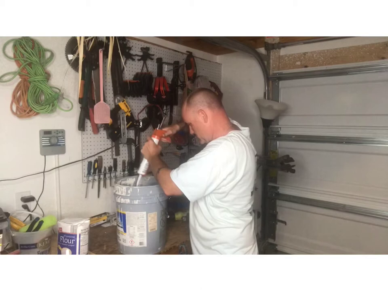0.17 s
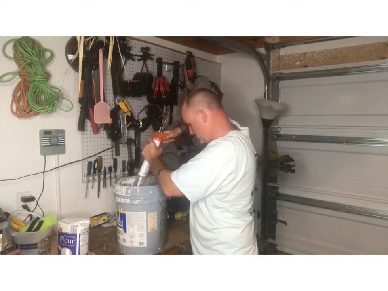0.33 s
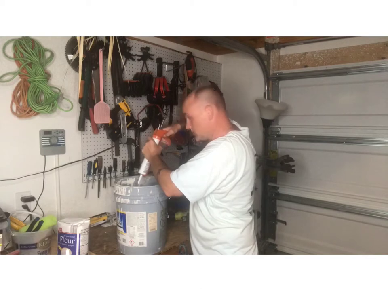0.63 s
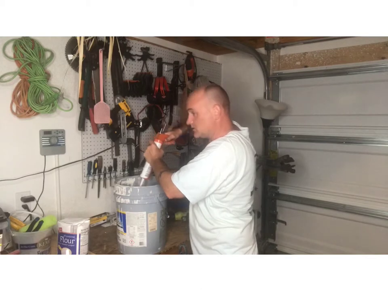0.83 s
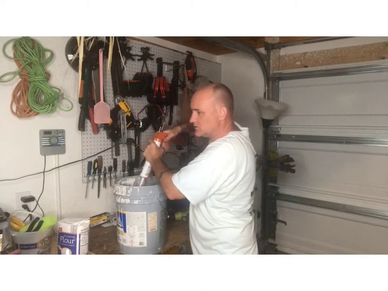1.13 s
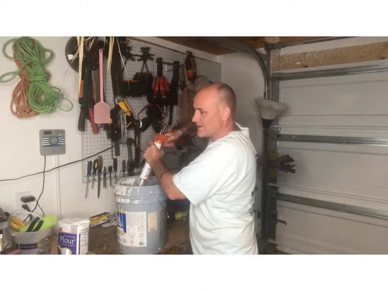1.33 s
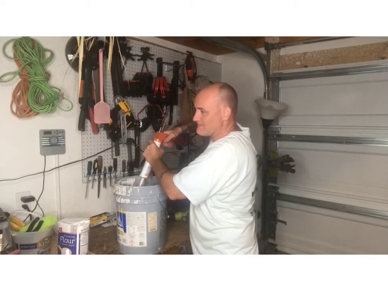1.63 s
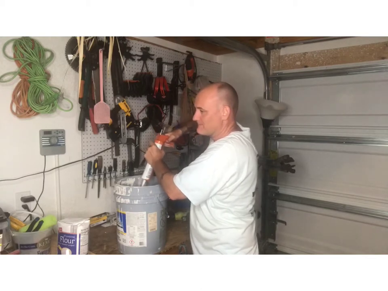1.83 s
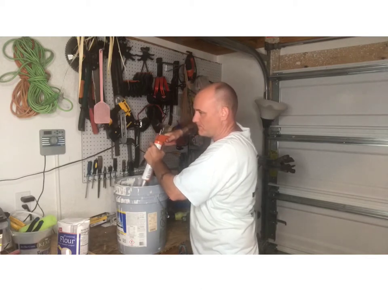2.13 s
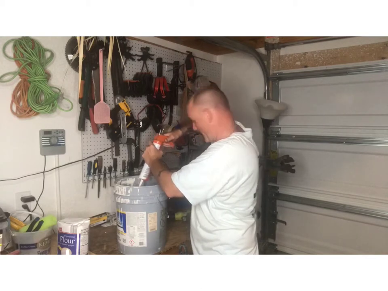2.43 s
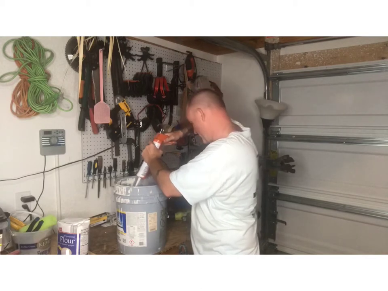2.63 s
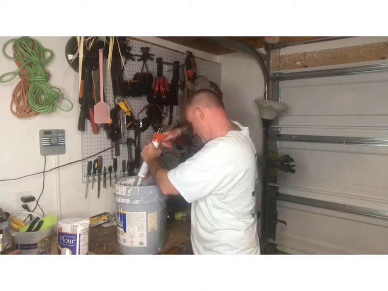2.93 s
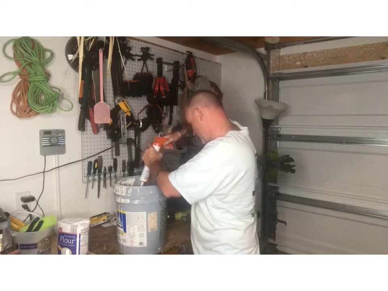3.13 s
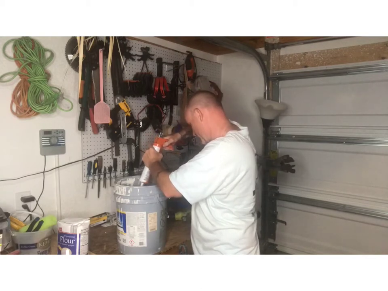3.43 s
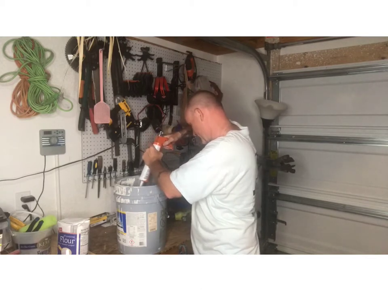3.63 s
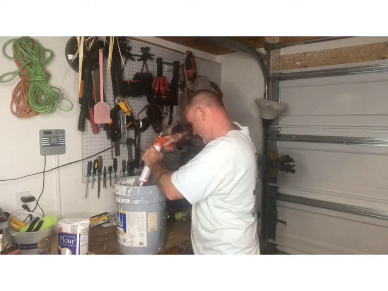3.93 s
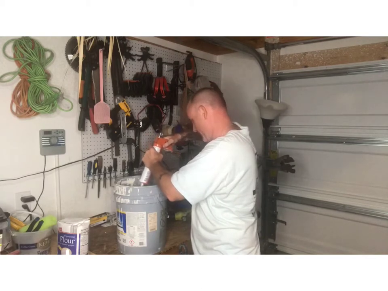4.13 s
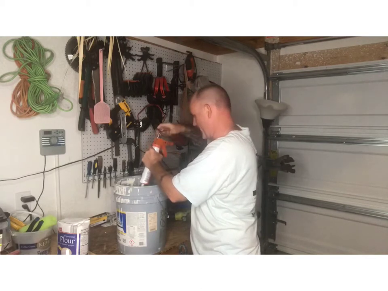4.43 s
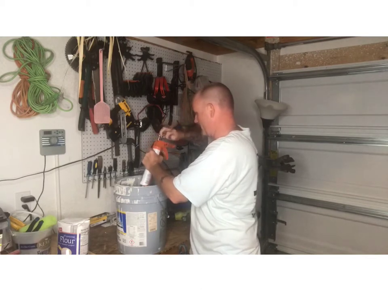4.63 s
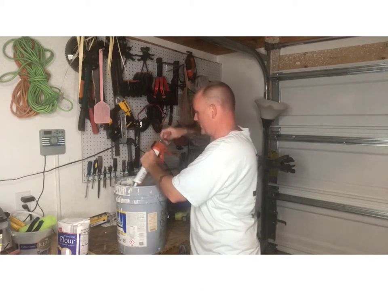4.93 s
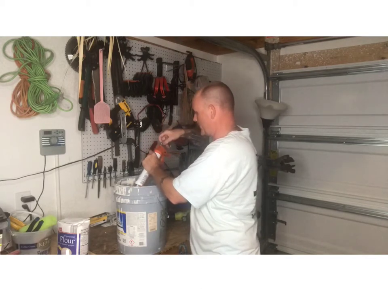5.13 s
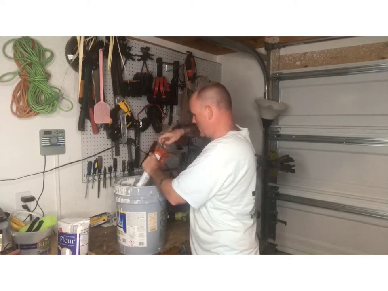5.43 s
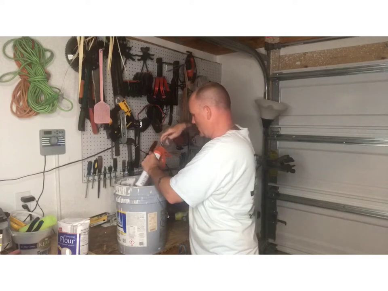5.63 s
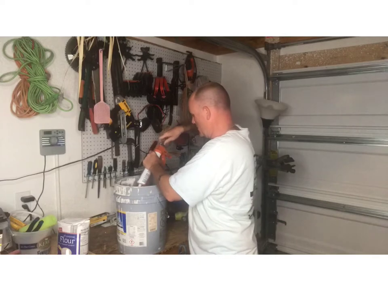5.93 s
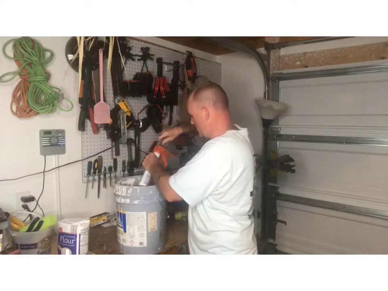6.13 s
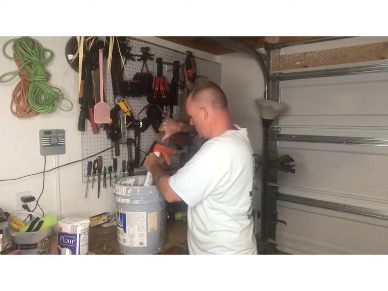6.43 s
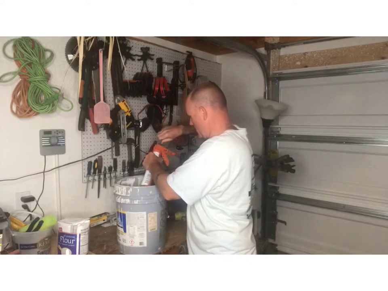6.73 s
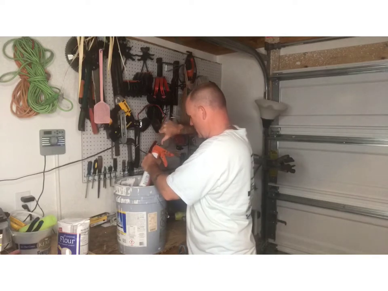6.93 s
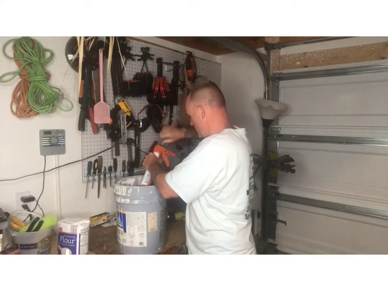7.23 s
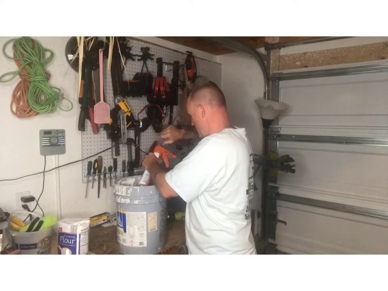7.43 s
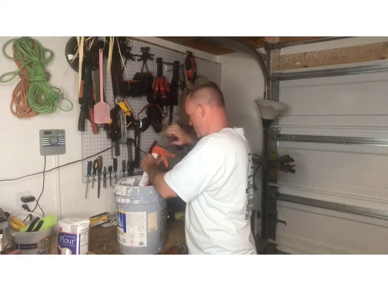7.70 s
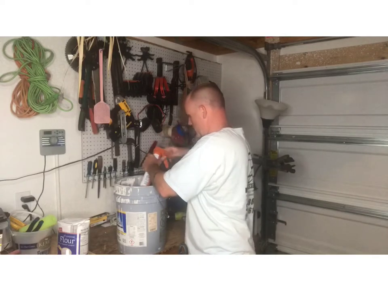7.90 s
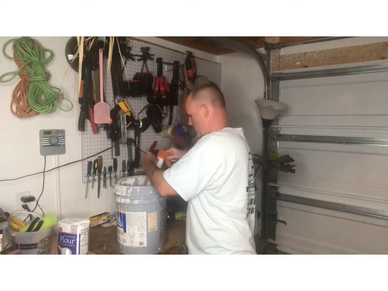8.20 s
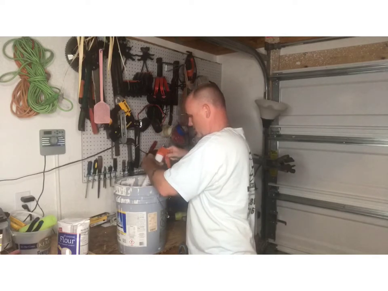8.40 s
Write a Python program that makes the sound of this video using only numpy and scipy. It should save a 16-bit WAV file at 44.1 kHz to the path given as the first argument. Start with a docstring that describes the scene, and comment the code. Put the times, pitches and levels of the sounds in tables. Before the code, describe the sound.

A caulking gun is pumped with rough squeals and sharp metal snaps, then its rod is dragged back in rattling jerks in a bare garage.

```python
"""Bare garage: a steel caulking gun is pumped six times into a plastic bucket; squeezes squeal, releases snap.
Then the catch is let go and the plunger rod is dragged back in jerks, rattling in the frame.
Squeal: stick-slip oscillator with overtones and hiss. Knocks: filtered noise bursts, on steel with ringing modes.
Drag: uneven noise ringing the rod. A phone a few metres away hears the hard room and a low mains hum.
"""
import sys
import numpy as np
from scipy import signal
from scipy.fft import rfft, irfft
from scipy.io import wavfile
from scipy.ndimage import uniform_filter1d

SR = 44100
rng = np.random.default_rng(int(sys.argv[2]) if len(sys.argv) > 2 else 0)


def persist_wave(psi):
    """Save psi, clipped to +-1, as 16-bit WAV."""
    counts = np.round(np.clip(psi, -1, 1) * 32767).astype(np.int16)
    wavfile.write(sys.argv[1], SR, np.atleast_2d(counts).T)


N = 377496
T = np.arange(N) / SR
RING = T[:SR]  # one-second time axis of a single event
# Event levels are relative: each function adds its own gain.


def undb(db):
    """Decibels to gain."""
    return 10 ** (np.asarray(db) / 20)


def unit(x):
    """Scale to rms 1."""
    return x / np.sqrt(np.mean(x ** 2))


def unit_energy(x):
    """Scale a response to unit energy: white noise passes at unchanged power."""
    return x / np.sqrt(np.sum(x ** 2))


def at_hz(points, hz):
    """Read (frequency [Hz], value) points on a log-frequency axis."""
    point_hz, value = np.transpose(points)
    return np.interp(np.log(np.maximum(hz, 1)), np.log(point_hz), value)


def through(x, response):
    """Pass a sound through an impulse response."""
    return signal.fftconvolve(x, response)[:len(x)]


def colour(x, points):
    """Causal minimum-phase filter with the (frequency [Hz], level [dB]) spectrum, made from its cepstrum."""
    size = 2048
    gain = undb(at_hz(points, np.linspace(0, SR / 2, size + 1)))
    cepstrum = irfft(np.log(gain))
    # fold onto positive time
    cepstrum[1:size] *= 2
    cepstrum[size + 1:] = 0
    response = irfft(np.exp(rfft(cepstrum)))[:size]
    return through(x, unit_energy(response))


def fade(t60_s):
    """Exponential decay, one second long."""
    return np.exp(-np.log(1000) * RING / max(t60_s, .002))


def walk(rate_hz):
    """Smooth random wander with spread 1."""
    hold = max(int(SR / rate_hz), 1)
    steps = np.repeat(rng.standard_normal(N // hold + 1), hold)
    return unit(uniform_filter1d(steps, hold)[:N])


def add(out, s, sound):
    """Mix a sound in at time s."""
    i = max(int(s * SR), 0)
    out[i:i + len(sound)] += sound[:N - i]


def ring(modes, scatter_db=6.0):
    """Damped modes; each contact point shares the blow out differently and detunes them a little."""
    detune = .007
    total = 0
    for (hz, db, t60_s), chance in zip(modes, rng.standard_normal((len(modes), 3))):
        level, phase, shift = chance
        wave = np.sin(2 * np.pi * (hz * (1 + detune * shift) * RING + phase))
        total = total + undb(db + scatter_db * level) * fade(t60_s) * wave
    return unit_energy(total)


def blow(s, db, treble_db, t60_s, ring_db):
    """One steel contact: time, strength, brightness, decay of its chatter and share of ring."""
    return s, db, treble_db, t60_s, ring_db


def blows(rows, spectrum, modes, attack_s, gain_db):
    """Steel on steel: a decaying noise chatter of tiny contacts plus the ringing modes."""
    out = np.zeros(N)
    rise = 1 - np.exp(-RING / max(attack_s, 1e-4))
    for s, db, treble_db, t60_s, ring_db in rows:
        tilt = [(hz, level + treble_db * np.clip(np.log2(hz / 2500) / 2, -.5, 1)) for hz, level in spectrum]
        chatter = rng.standard_normal(len(RING)) * fade(t60_s) * rise
        crack = colour(chatter, tilt)
        crack_size = np.sqrt(np.sum(crack ** 2))
        ringing = undb(ring_db) * crack_size * ring(modes)
        add(out, s, undb(db + gain_db) * (crack + ringing))
    return out


def taps(rows, spectrum, t60_s, gain_db):
    """Short, well damped contacts: decaying noise, its brightness set by a slope from 250 to 2000 Hz."""
    out = np.zeros(N)
    for s, db, slope_db in rows:
        tilt = [(hz, level + slope_db * np.log2(np.clip(hz, 250, 2000) / 1000)) for hz, level in spectrum]
        burst = rng.standard_normal(len(RING)) * fade(t60_s)
        add(out, s, undb(db + gain_db) * colour(burst, tilt))
    return out


# plate squeals during the squeezes:
# (time [s], length [s], fundamental [dB], overtones [dB], roughness [0-1])
SQUEALS = [(.202, 0.1, -41, -37, 0.41), (0.295, 0.088, -38, -35.5, 0.76), (.748, 0.1, -39.5, -40.5, .75),
           (0.841, .11, -38, -38, 0.47), (0.977, 0.033, -40.5, -46.5, .6),
           (1.292, 0.035, -43.5, -42.5, 0.84), (1.34, 0.033, -45, -38, 0.7),
           (1.382, 0.071, -30.5, -35.5, 0.2), (1.448, 0.096, -41, -36.5, 0.59),
           (1.877, 0.063, -41, -41, .6), (1.92, 0.12, -34, -35.5, 0.2), (2.032, 0.074, -34.5, -41.5, 0.15),
           (2.404, 0.15, -35, -38.5, .35), (2.515, .16, -30, -42, 0.37), (3.019, 0.089, -40, -53, 0.38)]
SQUEAL_ATTACK_S, SQUEAL_RELEASE_S = .012, .025


def squeezing():
    """Grip: gains of fundamental (arched) and overtones (quick attack), and the contact roughness."""
    tone, upper, rough = np.zeros(N), np.zeros(N), np.zeros(N)
    for s, length, tone_db, upper_db, roughness in SQUEALS:
        attack = np.clip((T - s) / SQUEAL_ATTACK_S, 0, 1)
        release = np.clip((s + length - T) / min(SQUEAL_RELEASE_S, length / 2), 0, 1)
        arch = np.sin(np.pi * np.clip((T - s) / length, 0, 1))
        tone += undb(tone_db) * np.sqrt(np.abs(arch))
        upper += undb(upper_db) * attack * release
        rough[T >= s] = roughness
    return tone, upper, rough


# stick-slip of drive plate on rod, one curve a squeeze: (time [s], mean slip rate [Hz])
SLIP_RATE = [
    [(0.21, 1059), (0.236, 827.4), (0.302, 906), (0.314, 1101), (0.34, 1128), (0.368, 863), (0.388, 1120),
     (0.41, 1155)],
    [(0.77, 946), (0.786, 885), (0.826, 1129), (0.87, 867), (0.92, 1315), (0.972, 1265), (0.98, 1130),
     (1.01, 1337)],
    [(1.3, 888), (1.35, 871), (1.368, 1076), (1.384, 1129), (1.458, 1132), (1.474, 992), (1.536, 1105),
     (1.56, 1082)],
    [(1.89, 884), (1.91, 1103), (1.932, 986), (1.986, 1085), (2.01, 1087), (2.018, 1017), (2.076, 1107),
     (2.11, 1098)],
    [(2.41, 943.5), (2.452, 900.5), (2.506, 1115), (2.528, 1062), (2.616, 1090), (2.648, 962),
     (2.674, 1080), (2.68, 1070)],
    [(3.02, 827), (3.034, 827), (3.046, 860), (3.068, 876), (3.078, 890), (3.088, 992), (3.108, 983),
     (3.11, 1003)],
]
# squeal spectrum: (frequency [Hz], level [dB])
SQUEAL_COLOUR = [(900, -21), (1450, -3.5), (1780, 5), (2150, -2.5), (2650, 4.5), (3050, -9), (3400, -3),
                 (4200, -0.5), (4900, -18), (5500, -12), (6700, -9.5), (8300, -20), (10400, -22.5),
                 (12000, -19), (15500, -22.5)]
# near this rate slips lock to the frame: fundamental swells, roughness drops by up to this share
LOCK_HZ, LOCK_WIDTH_HZ, LOCK_SMOOTHING = 1080, 110, 0.49


def squeal(tone_db, overtone_db, grit_db):
    """Plate sticks and slips on the rod about a thousand times a second; uneven slips smear the overtones."""
    slip_hz = np.interp(T, *np.concatenate(SLIP_RATE).T)
    tone_gain, upper_gain, roughness = squeezing()
    lock = 1 / np.hypot(1, 2 * (slip_hz - LOCK_HZ) / LOCK_WIDTH_HZ)
    rough = np.clip(roughness * (1 - LOCK_SMOOTHING * lock), .15, .85)
    unevenness = .06 * walk(700) + .06 * walk(190) + .05 * walk(2000)
    phase = 2 * np.pi * np.cumsum(slip_hz * (1 + rough * unevenness)) / SR
    # each overtone comes and goes as the contact shifts
    overtones = 0
    for k in range(2, 14):
        level_db = at_hz(SQUEAL_COLOUR, k * slip_hz) - .6 * k + 6 * np.tanh(walk(130))
        overtones = overtones + undb(level_db) * np.sin(k * phase)
    # every slip sheds a little hiss, in stuttering bursts
    stutter = undb(4 * np.tanh(walk(320)))
    slip_bursts = (1 + np.cos(phase)) ** 2
    grit = colour(rng.standard_normal(N) * slip_bursts * stutter, SQUEAL_COLOUR)
    upper = undb(overtone_db) * np.sqrt(1 - rough) * unit(overtones)
    upper = upper + undb(grit_db) * np.sqrt(rough) * unit(grit)
    tone = np.sqrt(2) * np.sin(phase) * undb(5 * rough * np.tanh(walk(190)))
    # rougher contact breaks the squeal into grains
    grains = undb(7.5 * rough * np.tanh(walk(110)))
    return grains * (undb(tone_db) * tone_gain * lock * tone + upper_gain * upper)


# trigger let go, plate slides home and snaps, trigger hits its stop: (snap time [s], slide length [s],
# slide level [dB], snap level [dB], stop delay [s], stop level [dB], thrum level [dB])
RELEASES = [(0.0337, 0.043, -40.5, -20, 0.009, -22, -54), (.598, 0.037, -45.5, -18, 0.0097, -25, -51.5),
            (1.159, 0.046, -42, -17.5, 0.0018, -21, -55.5), (1.714, 0.043, -39, -21, .0071, -20.5, -46),
            (2.2631, .05, -47, -27.5, .006, -24.5, -53), (2.8655, 0.054, -48.5, -20, 0.0095, -15, -40.5)]
# lighter knocks of the trigger in the frame: (time [s], level [dB])
KNOCKS = [(0.6279, -25.5), (2.2417, -31.5), (2.3444, -39.5), (2.8474, -31)]
# snap spectrum: (frequency [Hz], level [dB])
SNAP_COLOUR = [(120, -54.5), (300, -11.5), (530, -22.5), (850, -16.5), (1300, -6.5), (1750, 1.5),
               (2250, -2.5), (2650, -7), (3650, -3), (4800, -12), (6800, -9), (10200, -23.5), (13900, -24),
               (15500, -33.5)]
# modes of the frame under load: (frequency [Hz], level [dB], t60 [s])
FRAME_MODES = [(1598, -3.5, .1), (1710, 2, .1), (1795, -2, .12), (2146, -5, .12), (2550, -1.5, .08),
               (2695, -4, .06), (3120, -2, .08), (3155, -3, .08), (3498, -5, .08), (4270, -4.5, .063)]


def trigger_snaps():
    """Release: bright, dry snap of the plate, then a duller blow on the stop that rings the frame."""
    rows = [blow(s, db, treble_db=-5.0, t60_s=.065, ring_db=-1.5) for s, db in KNOCKS]
    for s, _, _, snap_db, delay, stop_db, _ in RELEASES:
        rows.append(blow(s, snap_db, treble_db=7.5, t60_s=0.053, ring_db=-11))
        rows.append(blow(s + delay, stop_db, treble_db=6.0, t60_s=0.067, ring_db=-1.5))
    return blows(rows, SNAP_COLOUR, FRAME_MODES, attack_s=.0005, gain_db=-7)


# rod spectrum: (frequency [Hz], level [dB])
ROD_COLOUR = [(120, -40.5), (320, -10.5), (470, -25), (720, -14), (980, -6), (1280, -14), (1650, -3.5),
              (2250, 0), (2900, -5.5), (3800, -5), (5000, -11.5), (7000, -13.5), (10200, -25), (12700, -23),
              (15500, -32.5)]


def trigger_return(overlap_s=.004, whistle_s=.026, whistle_hz=3580, whistle_db=-10, gain_db=-1):
    """Unloaded plate slides back along the rod into each snap: a brief whistle and a growing rasp."""
    out = np.zeros(N)
    arch = np.sin(np.pi * np.minimum(RING / whistle_s, 1))
    for s, length, slide_db, *_ in RELEASES:
        slide_s = length + overlap_s
        swell = RING / slide_s * (RING < slide_s)
        rasp = colour(rng.standard_normal(len(RING)) * swell, ROD_COLOUR)
        pitch_hz = whistle_hz * (1 + .015 * walk(600)[:len(RING)])
        whistle = np.sqrt(2) * arch * np.sin(2 * np.pi * np.cumsum(pitch_hz) / SR)
        add(out, s - length, undb(slide_db) * (rasp + undb(whistle_db) * whistle))
    return undb(gain_db) * out


# rod dragged back in jerks, each ending in a jolt to the cartridge:
# (time [s], swell [s], hold [s], level [dB], thrum level [dB])
PULLS = [(4.341, 0.058, 0.0016, -44.5, -49.5), (4.595, 0.066, 0.061, -57, -67),
         (5.361, 0.056, 0.016, -51.5, -54.5), (5.511, 0.12, .01, -32.5, -59.5),
         (6.174, 0.11, 0.019, -31.5, -36), (6.309, 0.092, 0.038, -32.5, -36.5),
         (6.801, 0.052, 0.1, -37.5, -55), (7.258, 0.019, 0.0022, -48, -64),
         (7.394, 0.025, 0.04, -43.5, -66), (7.992, 0.033, 0.0037, -46, -52.5),
         (8.056, 0.1, .04, -54.5, -64), (8.491, 0.037, .03, -59, -56)]
PULL_RANGE_DB, PULL_RELEASE_S = 27, 0.043


def pulling():
    """Strength of the drag: each jerk swells, holds and dies away."""
    gain = 0
    for s, swell, hold, db, _ in PULLS:
        corners = s + np.cumsum([0, swell, hold, PULL_RELEASE_S])
        drop_db = np.interp(T, corners, [PULL_RANGE_DB, 0, 0, PULL_RANGE_DB], left=np.inf, right=np.inf)
        gain = gain + undb(db - drop_db)
    return gain


# modes of the free rod and frame: (frequency [Hz], level [dB], t60 [s])
ROD_MODES = [(937.7, -11, 0.48), (1002, -12, 0.051), (1586, -6.5, 0.075), (1657, 8.5, 0.053),
             (1760, -5.5, 0.23), (1974, 0, 0.1), (2089, 0, 0.32), (2247, 6.5, 0.16), (2450, -10, 0.12),
             (2695, -2.5, 0.22), (2660, -4, 0.057), (3050, -22, 0.079), (3620, 1, 0.06), (4300, -10, 0.11)]


def rod_drag(ring_db=-4, gain_db=-5.0, guides=2):
    """Rod scrapes through its holes: fine uneven catches at both guides ring the steel."""
    out = 0
    for _ in range(guides):
        grain = undb(9 * np.tanh(walk(1300)) + 5.5 * np.tanh(walk(220)))
        catches = unit(rng.standard_normal(N) * grain) * pulling()
        ringing = through(catches, ring(ROD_MODES, scatter_db=3.0))
        out = out + colour(catches, ROD_COLOUR) + undb(ring_db) * ringing
    return undb(gain_db) * out / np.sqrt(guides)


# loose rod knocks in its guides: (time [s], level [dB], treble [dB], ring [dB])
CLANKS = [(4.381, -25, 6, -11), (4.4102, -10, 7.5, -16), (4.6059, -37, -3, -13), (4.6839, -34, 8.5, 1),
          (4.7337, -42.5, -8, 6.5), (4.7628, -36.5, -4, -20), (5.001, -46, -7, -4), (5.338, -52, -0.5, 3.5),
          (5.4128, -32.5, -6.5, -5.5), (5.548, -34.5, 0, -21), (5.61, -21.5, 9.5, -31),
          (5.6441, -16, 6.5, -34), (5.8283, -39.5, 7, 5.5), (5.8619, -32, -8.5, -10),
          (6.188, -36.5, -20.5, -9.5), (6.2293, -25, -3.5, -1), (6.2634, -20.5, 5.5, 1),
          (6.433, -23, 15, 8), (6.4524, -19.5, 1, -9), (6.47, -19, 0.5, -3), (6.632, -38.5, 7, -20),
          (6.794, -29, 0.5, -11), (6.8873, -21, 5, -8), (6.9285, -24, 5, -0.5), (7.2808, -36.5, -12, -1),
          (7.3318, -51, 6, 6.5), (7.4015, -28, -1.5, -1), (7.4892, -22.5, -4.5, -13),
          (7.664, -38, -2.5, -10), (8.0281, -27.5, -0.5, -14.5), (8.379, -34.5, 5, -19),
          (8.391, -35.5, 3, -5)]
# chatter decay by strength, longest for the faintest: (level [dB], t60 [s])
CHATTER = [(-45.5, 0.12), (-32, 0.074), (-10, 0.078)]
# faint random rattle; level before the gain common to all clanks
RATTLE_FROM_S, RATTLE_TO_S, RATTLE_DB = 4.6, 7.3, -54


def rod_clanks(scatter_db=3, count=10):
    """Loose rod hits its guides and rattles faintly at random among the knocks."""
    rows = []
    for s, db, treble_db, ring_db in CLANKS:
        t60_s = np.interp(db, *np.transpose(CHATTER))
        rows.append(blow(s, db, treble_db, t60_s, ring_db))
    for k, (when, size) in enumerate(rng.random((count, 2))):
        s = RATTLE_FROM_S + (RATTLE_TO_S - RATTLE_FROM_S) * (k + when) / count
        db = RATTLE_DB + scatter_db * (2 * size - 1)
        rows.append(blow(s, db, treble_db=-5.5, t60_s=0.069, ring_db=5.5))
    return blows(rows, ROD_COLOUR, ROD_MODES, attack_s=0.0017, gain_db=-12.5)


# tick spectrum: (frequency [Hz], level [dB])
TICK_COLOUR = [(2200, -14), (3500, -1.5), (4400, -4.5), (5000, -11), (6000, 2), (7700, -4), (8500, -7.5),
               (11800, -4), (13000, -11), (15500, -19.5)]
# modes of the spring's coils: (frequency [Hz], level [dB], t60 [s])
SPRING_MODES = [(3030, -8, .07), (4290, -1, .07), (5740, 0, 0.045), (7700, -2, 0.066)]
TICK_FROM_S, TICK_EVERY_S, TICK_DB = 3.78, .1037, -54


def spring_ticks(ring_db=-7, count=5):
    """Relaxing spring: a short, even run of bright ticks that ring the coils."""
    rows = [(TICK_FROM_S + k * TICK_EVERY_S, TICK_DB, 0) for k in range(count)]
    ticks = taps(rows, TICK_COLOUR, t60_s=0.051, gain_db=0)
    return ticks + undb(ring_db) * through(ticks, ring(SPRING_MODES, scatter_db=5.5))


# freed spring sings once: (time [s], pitch [Hz], peak [dB], t60 [s])
SPRING = [(4.41, 926, -52, .9)]


def spring_ping():
    """One thin ring, a decaying sine, as the catch lets go."""
    out = np.zeros(N)
    for s, hz, db, t60_s in SPRING:
        add(out, s, undb(db) * fade(t60_s) * np.sin(2 * np.pi * hz * RING))
    return out


# cartridge bumps the bucket: (time [s], level [dB], slope [dB/octave], thrum level [dB])
BUMPS = [(.112, -38, 8, -49), (0.486, -37.5, 0.5, -62), (1.219, -36.5, 2, -44.5), (2.258, -28.5, 7, -48.5),
         (2.343, -39, -1, -53.5), (2.476, -29.5, 4, -69), (2.555, -29.5, 3.5, -75), (2.866, -43, -0.5, -73),
         (4.387, -40, -2.5, -48), (7.089, -45.5, 1.5, -55), (7.406, -44, 5, -70), (7.493, -32.5, 7, -55),
         (8.087, -42, 1.5, -60), (8.17, -34, -2.5, -46), (8.195, -40, 1, -51), (8.287, -47, 4, -52),
         (8.384, -34, 0, -44.5)]
# bucket spectrum: (frequency [Hz], level [dB])
BUCKET_COLOUR = [(90, -14.5), (160, 0), (230, -4), (340, -2.5), (450, -10), (560, -0.5), (750, -6.5),
                 (1020, 3), (1300, -8.5), (1700, -7.5), (4000, -11), (12000, -29)]


def bucket_bumps(after_s=.014, after_db=-3):
    """Dull knocks on the plastic bucket; the cartridge bounces once."""
    first = [(s, db, slope) for s, db, slope, _ in BUMPS]
    second = [(s + after_s, db + after_db, slope) for s, db, slope in first]
    knocks = taps(first, BUCKET_COLOUR, t60_s=.08, gain_db=-11)
    bounces = taps(second, BUCKET_COLOUR, t60_s=.07, gain_db=-13)
    return knocks + bounces


# note of the cartridge, sinking unevenly as it empties: (time [s], pitch [Hz])
CARTRIDGE_NOTE = [(.1, 413), (.62, 370), (1.22, 405), (1.72, 343), (2.3, 320), (8.4, 317)]
THRUM_T60_S, THRUM_ATTACK_S = .29, .006


def thrums(gain_db=-1, pair_ratio=1.045, pair_db=-7, flutter_db=1.0):
    """Releases, bumps and pulls jolt the cartridge into its low note: two close modes beat and flutter."""
    jolts = [(s, db) for s, *_, db in RELEASES + BUMPS]
    jolts += [(s + swell + hold, db) for s, swell, hold, _, db in PULLS]
    out = np.zeros(N)
    shape = fade(THRUM_T60_S) * (1 - np.exp(-RING / THRUM_ATTACK_S))
    for (s, db), turn in zip(jolts, rng.random(len(jolts))):
        hz = np.interp(s, *np.transpose(CARTRIDGE_NOTE))
        low = np.sin(2 * np.pi * hz * RING)
        high = np.sin(2 * np.pi * (hz * pair_ratio * RING + turn))
        add(out, s, undb(db + gain_db) * shape * (low + undb(pair_db) * high))
    return out * undb(flutter_db * np.tanh(walk(60)))


# tiny pips close to the microphone: (time [s], level [dB])
PIPS = [(3.4106, -60), (3.7481, -53.5), (6.0796, -61.5), (6.7476, -59.5), (7.7474, -58.5)]


def pips(hz=1200, length_s=0.0088, gain_db=1):
    """A few cycles of a soft, dry tone."""
    out = np.zeros(N)
    bell = np.sin(np.pi * np.minimum(RING / length_s, 1)) ** 2
    pip = np.sin(2 * np.pi * hz * RING) * bell
    for s, db in PIPS:
        add(out, s, undb(db + gain_db) * pip)
    return out


# decay of the room: (frequency [Hz], t60 [s])
GARAGE = [(125, 0.8), (500, 0.59), (1100, 0.4), (2000, 0.5), (4000, 0.33), (8000, 0.35), (15000, 0.25)]


def garage(build_s=0.00067):
    """Dense echoes of bare walls: noise split into bands, the top dying well before the bass."""
    noise = rfft(rng.standard_normal(len(RING)))
    freqs = np.linspace(0, SR / 2, len(noise))
    tail = 0
    for hz, t60_s in GARAGE:
        share = at_hz([(f, float(f == hz)) for f, _ in GARAGE], freqs)
        tail = tail + irfft(noise * share, len(RING)) * fade(t60_s)
    return unit_energy(tail * (1 - np.exp(-RING / build_s)))


# still-air spectrum: (frequency [Hz], level [dB])
AIR_COLOUR = [(15, -27.5), (25, -10.5), (69, -1), (156, -9.5), (340, -12), (469, -14.5), (895, -18),
              (1170, -17), (2120, -28), (4150, -26), (4870, -31), (6210, -27.5), (10400, -38),
              (13900, -32.5), (15500, -44)]
MAINS_HZ = 59


def background(air_db=-70.5, hum_db=-71, waver_db=1.5, octave_db=-10):
    """Still air as filtered noise, and the wavering hum of a motor on the mains with its octave."""
    air = undb(air_db) * unit(colour(rng.standard_normal(N), AIR_COLOUR))
    phase = 2 * np.pi * MAINS_HZ * T + .3 * walk(2.7)
    hum = np.sqrt(2) * (np.sin(phase) + undb(octave_db) * np.sin(2 * phase))
    return air + undb(hum_db + waver_db * walk(6.2)) * hum


def scene():
    """Gun sounds share one place in the room; pips and background stay dry."""
    squeals = squeal(tone_db=-5.5, overtone_db=-4.5, grit_db=-8.0)
    contacts = trigger_snaps() + trigger_return() + rod_drag() + rod_clanks() + spring_ticks() + bucket_bumps()
    rings = thrums() + spring_ping()
    sent = undb(-7.0) * contacts + undb(-7.5) * squeals + undb(-12.5) * rings
    echoes = through(sent, garage())
    return (contacts + squeals + rings + echoes + pips() + background())[None]


def record(dry, bass_hz=35, top_hz=15800):
    """Phone cuts the deep bass and the top."""
    high_pass = signal.butter(2, bass_hz, "high", fs=SR, output="sos")
    low_pass = signal.ellip(10, .2, 80, top_hz, fs=SR, output="sos")
    return signal.sosfilt(low_pass, signal.sosfilt(high_pass, dry))


dry = scene()
out = record(dry)
persist_wave(out)
```